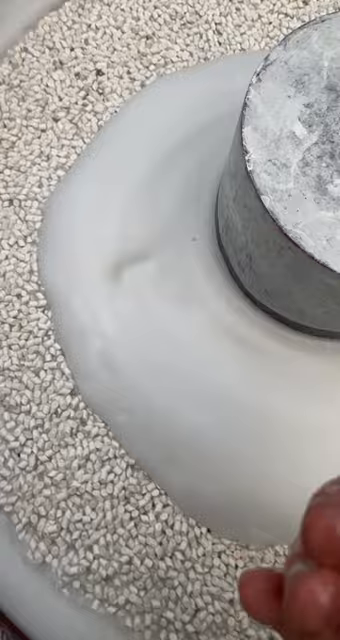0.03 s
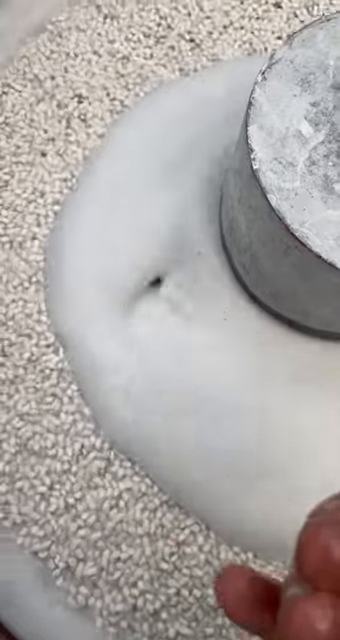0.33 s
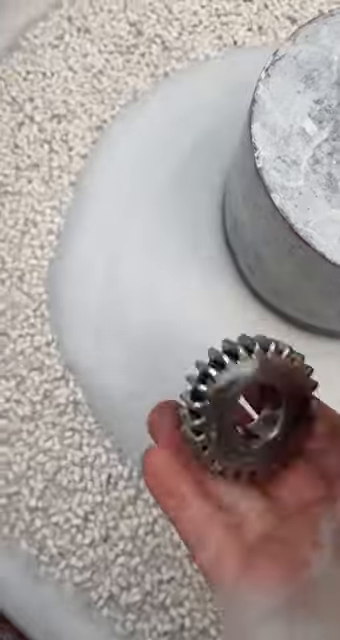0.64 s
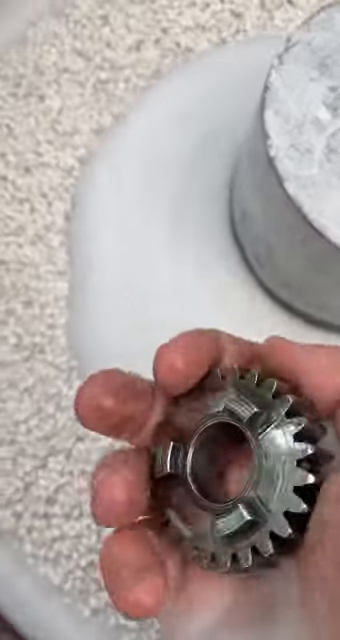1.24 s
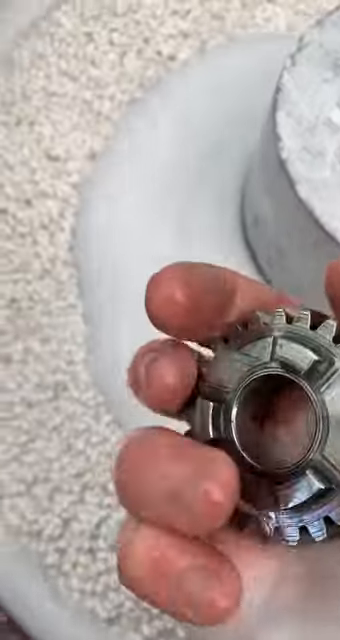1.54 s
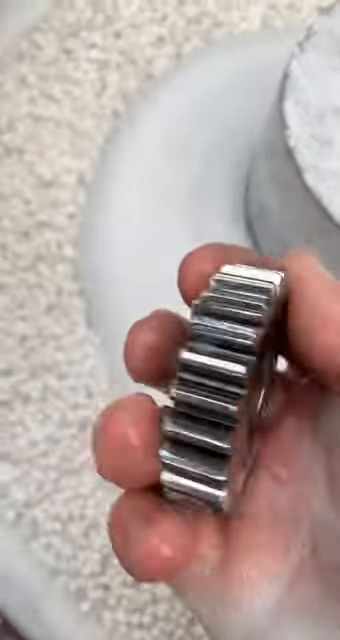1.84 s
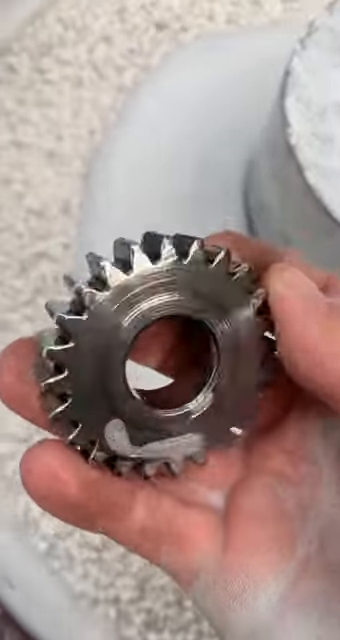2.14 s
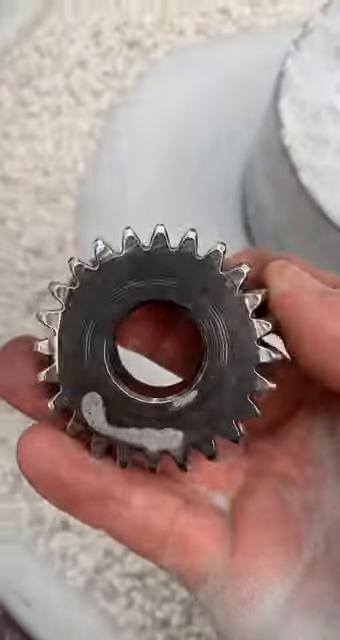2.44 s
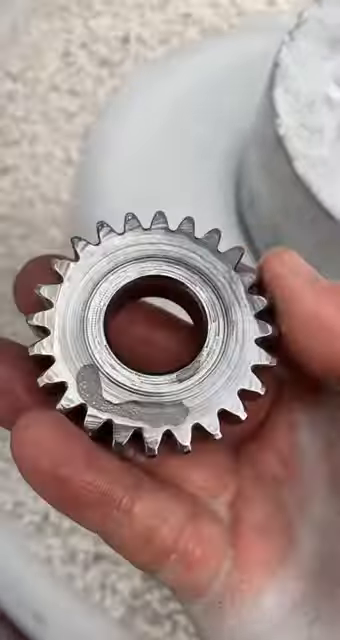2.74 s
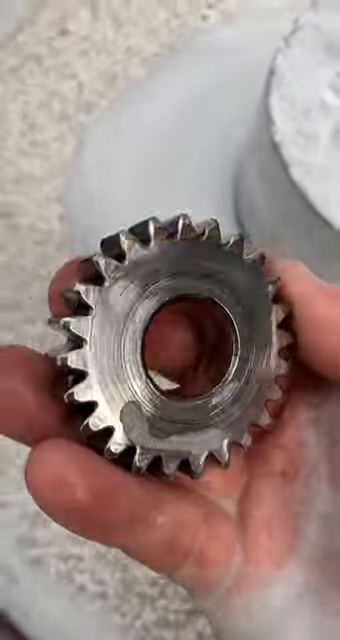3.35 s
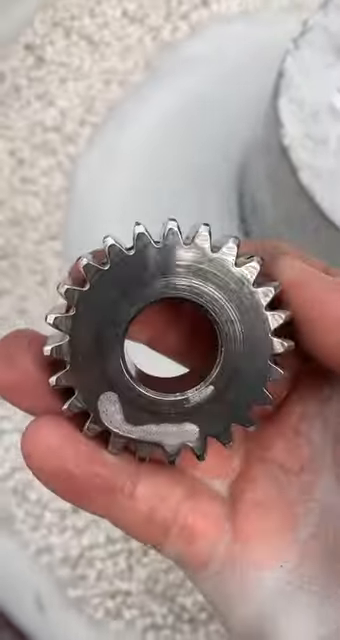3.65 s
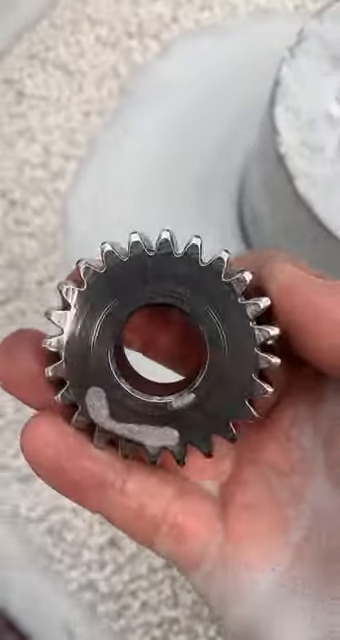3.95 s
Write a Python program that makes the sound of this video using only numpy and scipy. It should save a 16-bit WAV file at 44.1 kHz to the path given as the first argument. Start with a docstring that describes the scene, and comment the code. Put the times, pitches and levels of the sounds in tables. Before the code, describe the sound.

Small stones churn and rattle in a running vibratory tumbler, over its steady motor drone.

```python
"""A workshop, one microphone just above the bowl of a steadily running vibratory polishing machine.
An off-centre weight shakes the bowl about 25 times a second, so it drones, and the motor whines.
Each turn throws the load of small stones: they knock on the wall, which rings, hiss against each
other and land with a dull thud. Now and then a single stone clinks above the rest."""
import sys
import numpy as np
from scipy import signal
from scipy.fft import rfft, irfft
from scipy.io import wavfile

SR = 44100
rng = np.random.default_rng(int(sys.argv[2]) if len(sys.argv) > 2 else 0)


def pcm_store(signal):
    """Save signal as 16-bit PCM."""
    levels = np.round(np.clip(np.atleast_2d(signal), -1, 1) * 32767)
    wavfile.write(sys.argv[1], SR, levels.astype(np.int16).T)


N = 176400
T = np.arange(N) / SR
FREQS = np.fft.rfftfreq(N, 1 / SR) + 1e-3
SHAFT_HZ, SHAFT_WANDER = 24.59, .0008


def amp(db):
    """Decibels to gain."""
    return 10 ** (np.asarray(db) / 20)


def unit(x):
    """Scale to an rms of one."""
    return x / np.sqrt(np.mean(x ** 2))


def walk(rate_hz):
    """Smooth random drift at an rms of one, moving up to about rate_hz."""
    return unit(irfft(rfft(rng.standard_normal(N)) * np.exp(-(FREQS / rate_hz) ** 2), N))


def swell(curve):
    """A level curve as dB around its own mean."""
    db = np.interp(T, *np.array(curve).T)
    return db - db.mean()


def colour(x, spectrum):
    """Causal filter that gives a white sound the listed density."""
    hz, db = np.array(spectrum).T
    gain = amp(np.interp(np.log(FREQS), np.log(hz), db))
    cepstrum = irfft(np.log(gain), N)
    cepstrum[1:N // 2] *= 2  # fold for minimum phase
    cepstrum[N // 2 + 1:] = 0
    return irfft(rfft(unit(x)) * np.exp(rfft(cepstrum)), N) * np.sqrt(SR / 2)


def ring(x, hz, width_hz):
    """One resonance with trimmed skirts, at an rms of one."""
    detune = (FREQS / hz - hz / FREQS) * hz / width_hz
    return unit(irfft(rfft(x) / (1 + 1j * detune) / (1 + 1j * detune / 6), N))


def room(x, t60_s=.48, tail_db=-7.5):
    """The direct sound reaches the microphone first, the workshop's short tail 4 ms later."""
    tail = rng.standard_normal(N) * amp(-60 * T / t60_s) * (T > .004)
    return x + amp(tail_db) * irfft(rfft(x) * rfft(unit(tail)), N) / np.sqrt(N)


def throw(turns, lands, depth_db):
    """Gain over a turn, highest at the share of the turn where the load lands."""
    return amp(depth_db * np.cos(2 * np.pi * (turns - lands)))


def clicks(per_s, spread_db):
    """Random tiny collisions of uneven strength."""
    hits = (rng.random(N) < per_s / SR) * np.sign(rng.standard_normal(N))
    return unit(hits * amp(spread_db * rng.standard_normal(N)))


def tone(cycles, rms_db):
    """A sine with a random starting phase."""
    return amp(rms_db) * np.sqrt(2) * np.sin(2 * np.pi * (cycles + rng.random()))


# Drone from just above the bowl (multiple of the shaft rate, mean level [dB])
DRONE_PARTIALS = [(1, -38), (2, -40.5), (3, -48), (4, -45.5), (5, -46.5), (6, -39.5), (7, -29.5),
                  (9, -42.5), (10, -35), (11, -34), (14, -48), (20, -47), (36, -47), (44, -32), (47, -45),
                  (72, -47)]


def drone(turns, waver_db=1.66):
    """The bowl follows the off-centre weight, with overtones; each partial wavers."""
    return sum(tone(order * turns, db + waver_db * walk(8.6)) for order, db in DRONE_PARTIALS)


# Whine of the motor at the microphone (frequency [Hz], mean level [dB])
MOTOR_TONES = [(256, -37), (621.5, -37.5), (670.3, -37.5), (941.6, -33.5), (1264.3, -39)]


def motor(turns, waver_db=2.6):
    """Thin wavering tones that follow the shaft's speed."""
    return sum(tone(hz * turns / SHAFT_HZ, db + waver_db * walk(3.3)) for hz, db in MOTOR_TONES)


def knocks(turns, jitter_s, spread_db, per_turn):
    """Contacts that come back at the same places in every turn, never quite alike."""
    places = (np.arange(per_turn) + rng.random(per_turn)) / per_turn
    at_turn = np.arange(int(turns[-1]) + 1)[:, None] + places
    when = np.interp(at_turn, turns, T, right=np.nan) + jitter_s * rng.standard_normal(at_turn.shape)
    size = rng.standard_normal(per_turn) * amp(spread_db * rng.standard_normal(when.shape))
    heard = np.isfinite(when)
    return unit(np.bincount((when[heard] * SR).astype(int) % N, size[heard], N))


# Resonances of the bowl wall, close up (frequency [Hz], width [Hz], level [dB])
WALL_MODES = [(886.6, 16, -31.5), (985, 26, -32), (1048.4, 39, -27.5), (1068, 11, -31), (1609, 13, -31.5),
              (1635, 11, -41.5), (1747, 44, -29), (1818, 58, -22.5), (1882.7, 19, -25.5), (1901.5, 12, -27),
              (2208, 44, -26), (2294, 22, -31), (2473, 117, -27.5), (3003, 90, -31.5)]
# Swell of the wall's lower ring, taken around its mean (time [s], level [dB])
LOW_RING_SWELL = [(0.0, -25.0), (0.5, -23.6), (0.65, -25.3), (0.8, -20.3), (1.15, -19.5), (1.55, -21.8),
                  (1.85, -21.0), (1.95, -23.4), (2.3, -20.4), (2.45, -23.1), (3.2, -23.9), (3.3, -22.4),
                  (3.45, -24.3), (4.0, -23.1)]
# Swell of its upper ring, taken around its mean (time [s], level [dB])
HIGH_RING_SWELL = [(0.0, -17.3), (0.15, -19.0), (0.2, -16.6), (0.45, -17.9), (1.0, -16.5), (1.1, -17.8),
                   (1.35, -18.0), (1.7, -16.5), (1.95, -19.5), (2.25, -17.2), (2.35, -18.9), (2.5, -15.8),
                   (2.55, -17.9), (3.15, -17.7), (3.25, -20.1), (3.45, -15.5), (3.55, -17.9), (4.0, -18.9)]


def wall(turns):
    """Repeating knocks and loose stones ring the wall of the bowl; its two main rings come and go."""
    repeating = knocks(turns, jitter_s=.00012, spread_db=1.5, per_turn=20)
    blows = room(repeating + clicks(per_s=4000, spread_db=2))
    out = 0
    for hz, width_hz, db in WALL_MODES:
        if 1020 < hz < 1150:
            db = db + swell(LOW_RING_SWELL)
        elif 1680 < hz < 2000:
            db = db + swell(HIGH_RING_SWELL)
        out = out + amp(db) * ring(blows, hz, width_hz)
    return out


# Stones rubbing together just below the microphone (frequency [Hz], density [dB per Hz])
HISS_SPECTRUM = [(500, -76), (600, -63.5), (650, -56), (780, -61.5), (900, -56), (1100, -56), (1230, -60),
                 (1450, -54), (1570, -62.5), (1700, -52), (2120, -54.5), (2750, -54.5), (3200, -54),
                 (4000, -58.5), (5100, -61), (6400, -65.5), (8000, -72), (10000, -79), (11500, -86.5),
                 (13200, -101), (15600, -101)]
# How hard the load churns, taken around its mean (time [s], level [dB])
CHURN_SWELL = [(0.0, -16.5), (0.45, -16.5), (0.95, -16), (1.1, -16.5), (1.2, -15.5), (1.8, -16),
               (1.85, -15), (2.15, -16.5), (2.7, -16), (2.95, -17), (3.55, -15.5), (3.6, -17.5),
               (3.7, -15.5), (3.8, -16.5), (3.9, -17), (4.0, -17.5)]


def stones(turns):
    """A dense hiss of collisions that pulses unevenly with every throw."""
    grains = clicks(per_s=18000, spread_db=2.5)
    pulse = throw(turns + .06 * walk(15), lands=.12, depth_db=.82)
    hiss = colour(room(grains * pulse), HISS_SPECTRUM)
    return hiss * amp(swell(CHURN_SWELL) + .69 * walk(17))


# The load slumping against the bowl, close up (frequency [Hz], density [dB per Hz])
SLUMP_SPECTRUM = [(20, -92), (42, -85), (64, -71), (115, -66.5), (180, -54), (300, -53.5), (370, -56.5),
                  (455, -52), (540, -61.5), (700, -95.5)]
# Weight of the slumping load, taken around its mean (time [s], level [dB])
LOAD_SWELL = [(0.0, -28.5), (0.95, -26), (1.25, -26.5), (2.2, -28), (2.5, -27), (3.05, -27.5), (3.4, -26),
              (4.0, -28.5)]


def slump(turns):
    """The whole load lands once a turn with a dull thud, some throws heavier than others."""
    weight = throw(turns, lands=.25, depth_db=1.0) * amp(swell(LOAD_SWELL) + 1.34 * walk(16))
    return colour(clicks(per_s=4000, spread_db=2.5) * weight, SLUMP_SPECTRUM)


# Single stones, close and dry, by their lower partial (time [s], frequency [Hz], level [dB])
STONE_CLINKS = [(.5648, 2160, -15), (0.9308, 2440, -12), (1.5026, 2140, -15), (1.878, 2550, -10),
                (2.1167, 2460, -18)]


def clinks(t60_s=.035, overtone_ratio=1.22, overtone_db=-4):
    """Each stone rings briefly with two partials."""
    out = 0
    for at, hz, db in STONE_CLINKS:
        age = np.maximum(T - at, 0)
        phase = 2 * np.pi * hz * age
        partials = np.sin(phase) + amp(overtone_db) * np.sin(overtone_ratio * phase)
        out = out + amp(db - 60 * age / t60_s) * partials
    return out


def scene():
    """One shaft drives the whole machine, heard in mono from above the bowl."""
    shaft_hz = SHAFT_HZ * (1 + SHAFT_WANDER * walk(2))
    turns = .056 + np.cumsum(shaft_hz) / SR
    return (drone(turns) + motor(turns) + wall(turns) + stones(turns) + slump(turns) + clinks())[None]


def record(dry, start_s=.0355, top_hz=15500):
    """The sound cuts in after a moment and loses its very top."""
    lowpass = signal.ellip(10, .1, 80, top_hz, fs=SR, output="sos")
    return signal.sosfilt(lowpass, dry * (T >= start_s))


dry = scene()
out = record(dry)
pcm_store(out)
```